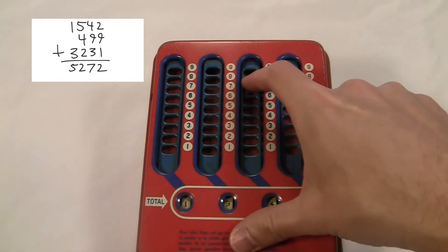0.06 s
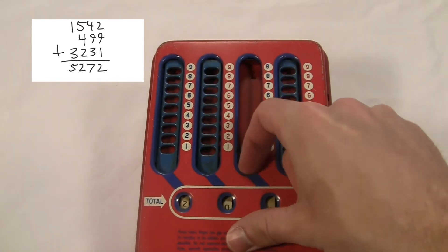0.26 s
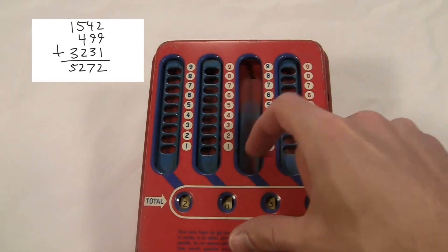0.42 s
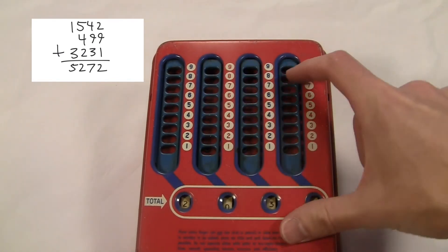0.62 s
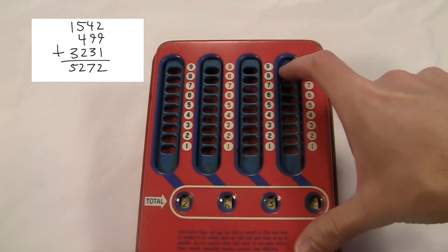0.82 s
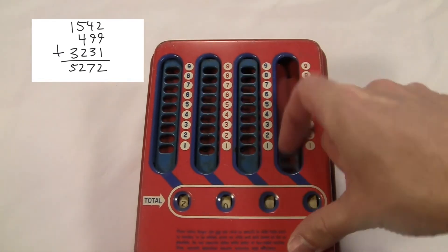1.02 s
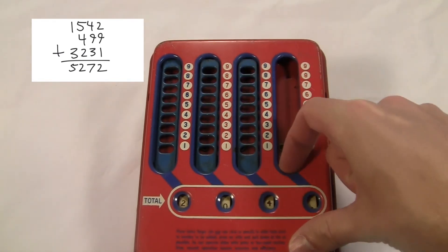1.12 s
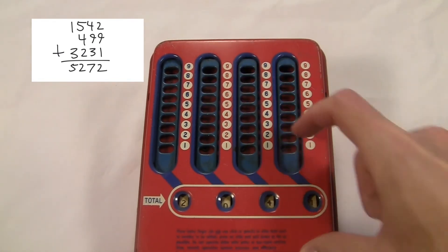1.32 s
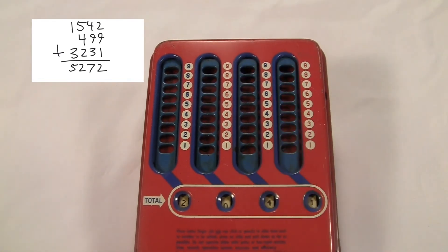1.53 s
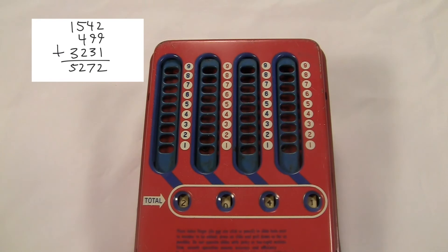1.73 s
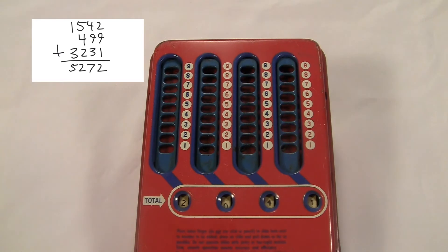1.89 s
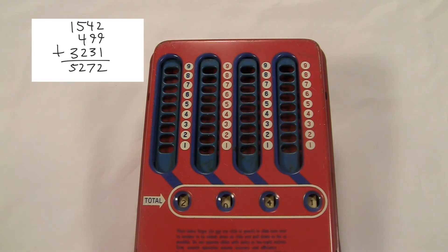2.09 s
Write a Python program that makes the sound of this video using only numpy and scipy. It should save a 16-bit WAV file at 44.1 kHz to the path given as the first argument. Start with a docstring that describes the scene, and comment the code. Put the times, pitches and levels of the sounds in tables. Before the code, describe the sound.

A tin adding machine's sliders scrape down and spring back with sharp, ringing snaps.

```python
"""Sharp snaps, gritty rasps and a tinny ring: a finger pulls two sliders of a small tin
adding machine down and lets each spring back. Catches snap, the sliders scrape along their
slots and thud into the end stops, and the case and its springs ring on in a quiet room.
Gain control ducks each stroke and lets the ringing swell back."""
import sys
import numpy as np
from scipy import signal
from scipy.io import wavfile

SR = 44100
rng = np.random.default_rng(int(sys.argv[2]) if len(sys.argv) > 2 else 0)


def output_pcm(signal):
    """Save a mono or channel-first signal as 16-bit PCM at the path in sys.argv[1].

    Samples are clipped to [-1, 1] before scaling.
    """
    pcm = np.clip(np.atleast_2d(signal).T, -1, 1) * 32767
    wavfile.write(sys.argv[1], SR, np.round(pcm).astype(np.int16))


N = 94815
LEAD = SR // 2  # pre-roll, so an earlier stroke is still ringing at the start

# Stereo width, as an EQ on the side signal: f/Hz, gain/dB
SIDE_EQ = [(100, -23), (300, -18), (1000, -19), (3000, -19.5), (6000, -12), (10000, -17), (13000, 1)]


def amp(db):
    """Decibels to gain."""
    return 10 ** (np.asarray(db) / 20)


def unit(x):
    """Scales to energy 1."""
    return x / np.sqrt(np.sum(x ** 2) + 1e-20)


def read(points, hz):
    """Reads a curve on a log-frequency axis."""
    f, value = np.transpose(points)
    return np.interp(np.log(hz + 1), np.log(f + 1), value)


def add(mix, s, sound):
    """Mixes a sound in at s seconds; negative times fall in the pre-roll."""
    part = mix[max(round(s * SR) + LEAD, 0):][:len(sound)]
    part += sound[:len(part)]


def colour(x, db_at, size=4096):
    """Minimum-phase filter with the gain db_at(Hz)."""
    log_gain = np.log(amp(db_at(abs(np.fft.fftfreq(size, 1 / SR)))))
    taps = np.fft.ifft(np.exp(np.conj(signal.hilbert(log_gain)))).real
    return signal.fftconvolve(x, taps[:size // 2])[:len(x)]


def equalise(x, curve):
    """Shapes a sound with an EQ curve."""
    return colour(x, lambda hz: read(curve, hz))


def tilted(x, db_per_octave):
    """Brightens or dulls a contact, pivoting at 4 kHz."""
    return colour(x, lambda hz: db_per_octave * np.log2(np.maximum(hz, 400) / 4000))


def ring(modes, t):
    """Struck modes, each a decaying sine."""
    return sum(amp(db - 60 * t / t60) * np.sin(2 * np.pi * hz * t) for hz, db, t60 in modes)


def room_tone(level_db=-51.5, width_db=9):
    """A low, steady bed of room noise, almost the same in both ears."""
    # Rumble spectrum: f/Hz, relative level/dB
    rumble_eq = [(15, -30.5), (30, -15), (50, 3), (80, -5), (140, -8.5), (270, -7), (400, -11.5),
                 (700, -17.5), (1500, -24), (4000, -33.5), (10000, -38.5), (15500, -42.5)]
    rumbles = [equalise(rng.standard_normal(N + LEAD), rumble_eq)[LEAD:] for _ in range(2)]
    mid, side = [unit(rumble) * np.sqrt(N) for rumble in rumbles]
    side = amp(width_db) * equalise(side, SIDE_EQ)
    return amp(level_db) * (mid + np.array([side, -side]))


def slips(samples, per_s=2000, spread_db=4):
    """Friction grit: a dense train of tiny slips of uneven size, rms 1."""
    size = amp(spread_db * np.minimum(rng.exponential(1, samples), 2))
    direction = rng.choice([-1, 1], samples)
    slipping = rng.random(samples) < per_s / SR
    return unit(size * direction * slipping) * np.sqrt(samples)


def slider_rasps():
    """Force of the sliders scraping in their slots: grit that follows the pressure."""
    # Scrapes: t/s, time until fade/s, level/dB, rise/s, fade/s, tilt/(dB per octave)
    scrapes = [(-.39, .055, -2.5, .01, .015, -1), (0.058, 0.02, -50, 0.0025, .01, -2),
               (0.212, 0.021, -42.5, 0.0073, 0.0038, -5.5), (0.266, 0.027, 2, 0.0014, 0.0045, 0.5),
               (0.3082, 0.018, 2, 0.00074, 0.015, -.5), (0.479, 0.0089, -12.5, 0.0021, 0.0078, -2),
               (0.499, 0.036, 0, 0.0092, .018, 0), (.985, 0.064, -43, 0.024, .005, -4),
               (1.053, 0.0098, -20.5, 0.0023, 0.0032, -4.5), (1.07, 0.047, -1, 0.004, 0.0031, -0.05),
               (1.13, 0.012, -4.5, 0.0022, 0.01, 0), (1.313, 0.0056, -17, .001, .005, -1.5),
               (1.3234, 0.042, 0.5, 0.018, 0.012, 0.08), (1.382, 0.004, -12, .001, 0.015, 0)]
    force, t = np.zeros(N + LEAD), np.arange(SR // 4) / SR
    for s, hold, db, rise, fade, tilt in scrapes:
        pressure = np.minimum(t / rise, 1) * np.exp(-np.maximum(t - hold, 0) / fade)
        add(force, s, amp(db) * tilted(slips(len(t)) * pressure, tilt))
    return force


def shimmer(samples):
    """The long, noisy tail of springs and case; the highs die first."""
    # Tail colour: f/Hz, gain/dB
    tail_eq = [(60, -26.5), (200, -18), (450, -12), (700, -6.5), (1100, -11.5), (2200, -15), (3800, -15),
               (5500, -20), (8500, -17), (9800, -14), (11000, -22.5), (15000, -51)]
    # Tail decay: f/Hz, T60/s
    tail_t60 = [(200, 1.13), (700, 0.92), (2000, 0.85), (5000, 0.76), (10000, 0.55), (14000, 0.5)]
    hz, age, spectrum = signal.stft(rng.standard_normal(samples), SR, nperseg=256)
    decay = amp(-60 * age / read(tail_t60, hz)[:, None])
    _, tail = signal.istft(spectrum * decay, SR, nperseg=256)
    return equalise(unit(tail[:samples]), tail_eq)


def tin_response(clatter_db=1, clatter_t60_s=0.057):
    """One tap on the tin: a crack and short clatter through the panels, then the shimmer."""
    # Broad colour of the tin: f/Hz, gain/dB
    tin_eq = [(30, -38), (100, -18.5), (200, -9), (400, -6.5), (700, 2), (1100, 0.5), (1900, -1.5),
              (3000, 0.5), (4000, 1.5), (5500, -5.5), (7200, -4), (8600, 3), (9900, 1.5), (10900, -6.5),
              (12500, -12), (15500, -25.5)]
    # Panel resonances: f/Hz, width/Hz, level/dB
    panel_peaks = [(690, 59, -2), (1740, 69, 2), (2460, 46, -7.5), (2940, 63, -11), (3090, 130, -7.5),
                   (3780, 25, -5.5), (6700, 58, -12.5), (7350, 230, -4.5), (8040, 71, -3.5),
                   (8620, 190, -6), (9480, 300, -1.5), (10400, 48, -5)]

    def body_db(hz):
        peaks = sum(amp(db) / (1 + (2 * (hz - f) / width) ** 2) for f, width, db in panel_peaks)
        return read(tin_eq, hz) + 20 * np.log10(1 + peaks)

    t = np.arange(SR * 3 // 2) / SR
    tap = amp(clatter_db) * unit(rng.standard_normal(len(t)) * amp(-60 * t / clatter_t60_s))
    tap[0] += 1  # the crack ahead of the clatter
    return colour(unit(tap), body_db) + shimmer(len(t))


def end_stops(build_s=0.0072):
    """A slider thuds into its stop and sets the low notes of the case ringing."""
    # Hits on the stops: t/s, thud level/dB, case level/dB
    stop_hits = [(-.34, -20, -1), (.285, -10, -11), (.33, -14, 1.5), (.528, -0.5, 3), (1.112, -6.5, -1.5),
                 (1.362, -5.5, -1)]
    # Short modes of the thud: f/Hz, level/dB, T60/s
    thud_modes = [(523, -17, 0.12), (622, -10.5, 0.066), (678, -2, 0.12), (732, -6.5, 0.2)]
    # Lingering modes of the case: f/Hz, level/dB, T60/s
    case_modes = [(144.7, -36.5, 0.65), (205.5, -24, 0.7), (275, -37, 1.56), (675, -29, .7),
                  (725, -29, 0.89)]
    out, t = np.zeros(N + LEAD), np.arange(SR * 3 // 2) / SR
    thud = ring(thud_modes, t)
    case = ring(case_modes, t) * (1 - np.exp(-t / build_s))
    for s, thud_db, case_db in stop_hits:
        add(out, s, amp(thud_db) * thud + amp(case_db) * case)
    return out


def spring_twangs(build_s=0.015):
    """The springs sing thin, long notes in close pairs that beat."""
    # Spring modes: f/Hz, level/dB, T60/s
    spring_modes = [(2183, -36, 1.53), (2165, -41, 1.4), (5134, -34.5, 0.97), (5210, -35.5, 0.76),
                    (8120, -40, .8), (8200, -43.5, 1)]
    # Springs set singing: t/s, level/dB
    twang_cues = [(-.34, -1.5), (.31, -1), (.535, -7.5), (1.12, -9), (1.365, -9), (1.515, -5.5)]
    out, t = np.zeros(N + LEAD), np.arange(SR * 3 // 2) / SR
    note = ring(spring_modes, t) * (1 - np.exp(-t / build_s))
    for s, db in twang_cues:
        add(out, s, amp(db) * note)
    return out


def finger_bumps(rise_s=.003, decay_s=0.012):
    """Soft, dull puffs as the hand shifts on the case."""
    # Touches: t/s, level/dB
    touches = [(.002, -25), (.075, -27), (.163, -26), (.975, -30.5)]
    # Muffled colour of a touch: f/Hz, gain/dB
    touch_eq = [(40, -14.5), (130, 2.5), (250, -2.5), (650, -4.5), (1500, -24), (6000, -44.5)]
    out, t = np.zeros(N + LEAD), np.arange(SR // 8) / SR
    for s, db in touches:
        push = rng.standard_normal(len(t)) * np.minimum(t / rise_s, 1) * np.exp(-t / decay_s)
        add(out, s, amp(db) * equalise(push, touch_eq))
    return out


def catch_snaps(chatter_s=0.0007):
    """Force of the snapping catches, each chattering briefly as it seats."""
    # Snaps: t/s, level/dB, tilt/(dB per octave)
    snap_cues = [(.099, -4.5, -2), (0.2376, 14.5, 0), (0.2605, 28, 0.5), (.497, 19.5, 2),
                 (0.5133, 24.5, -1.5), (0.809, 2, -1.5), (1.0381, 14.5, 0), (1.0655, 28.5, 1),
                 (1.0762, 23, -0.5), (1.129, 25, 0.5), (1.3246, 19.5, -.5), (1.3362, 24.5, -1)]
    force, t = np.zeros(N + LEAD), np.arange(SR // 4) / SR
    for s, db, tilt in snap_cues:
        snap = unit(rng.standard_normal(len(t)) * np.exp(-t / chatter_s))
        add(force, s, amp(db) * tilted(snap, tilt))
    return force


def tin_contacts(points):
    """Snaps and rasps act at points of contact, each ringing the tin in its own way."""
    out = np.zeros(N + LEAD)
    for _ in range(points):
        force = catch_snaps() + slider_rasps()
        out += signal.fftconvolve(force, tin_response())[:len(out)]
    return out / np.sqrt(points)


def scene(lean_db=.15):
    """The machine straight ahead, with a little width from its panels, over the room tone."""
    mid = (tin_contacts(points=4) + end_stops() + spring_twangs() + finger_bumps())[LEAD:]
    side = equalise(tin_contacts(points=1), SIDE_EQ)[LEAD:]
    balance = amp([[lean_db], [-lean_db]])
    return np.array([mid + side, mid - side]) * balance + room_tone()


def smooth(x, lag_s):
    """One-pole lag."""
    pole = np.exp(-1 / (lag_s * SR))
    return signal.lfilter([1 - pole], [1, -pole], x)


def record(dry, limit_db=-13, sense_s=0.0032, attack_s=0.00074, recover_db_per_s=40.5):
    """Gain control grips fast and recovers steadily; peaks clip, and the band edges roll off."""
    # Microphone response: f/Hz, gain/dB
    mic_eq = [(15, -22), (45, -6), (120, -1.5), (10300, 0), (12500, -4.5), (16000, -25)]
    power = smooth((dry ** 2).mean(0), sense_s)
    over_db = np.maximum(10 * np.log10(power + 1e-12) - limit_db, 0)
    recovery_db = np.arange(N) * recover_db_per_s / SR
    held_db = np.maximum.accumulate(over_db + recovery_db) - recovery_db  # catch each peak, then let go
    clipped = np.clip(dry * amp(-smooth(held_db, attack_s)), -1, 1)
    voiced = np.array([equalise(channel, mic_eq) for channel in clipped])
    high_cut = signal.firwin(255, cutoff=16400, window=("kaiser", 9), fs=SR)
    return signal.oaconvolve(voiced, high_cut[None], "same")


dry = scene()
out = record(dry)
output_pcm(out)
```